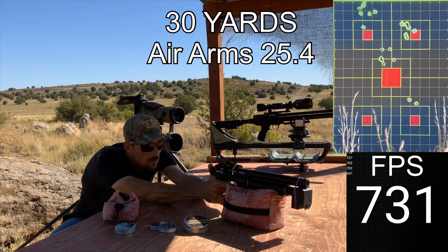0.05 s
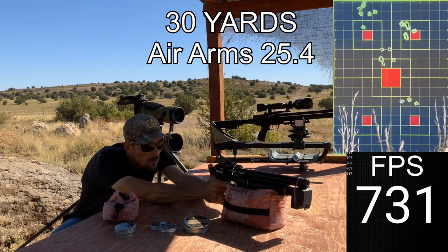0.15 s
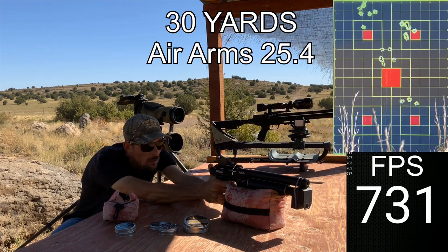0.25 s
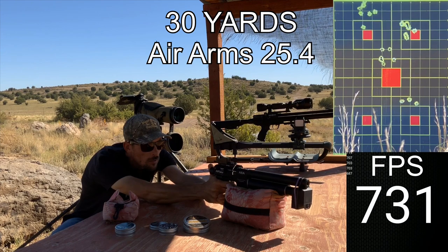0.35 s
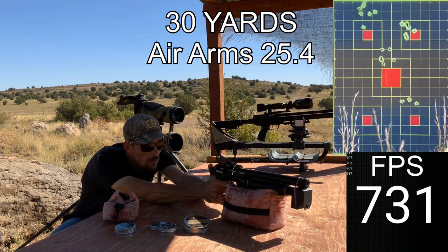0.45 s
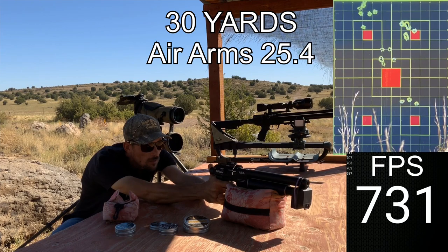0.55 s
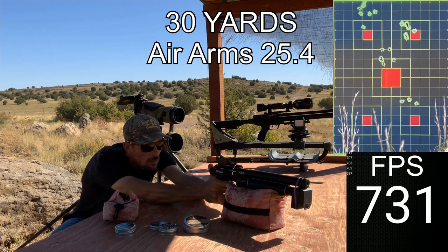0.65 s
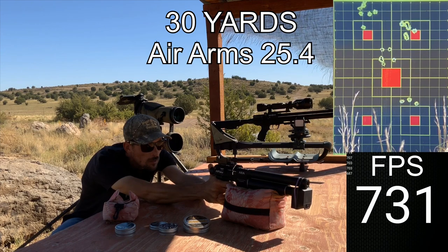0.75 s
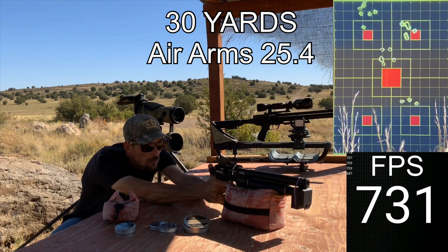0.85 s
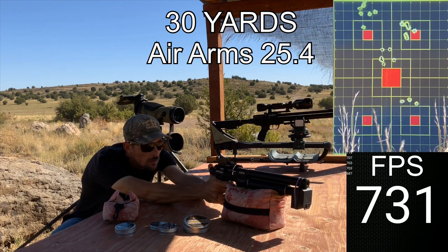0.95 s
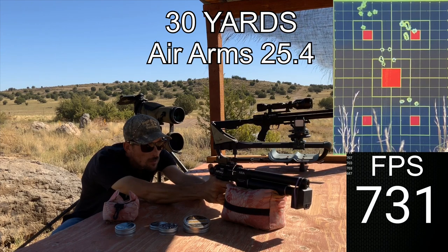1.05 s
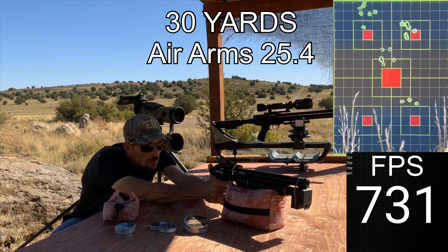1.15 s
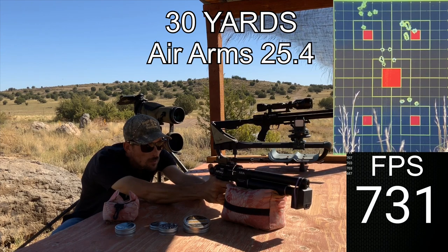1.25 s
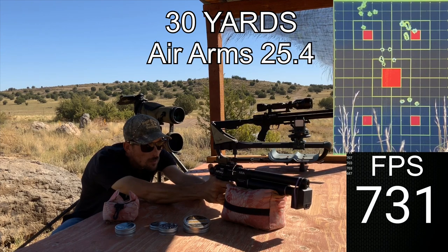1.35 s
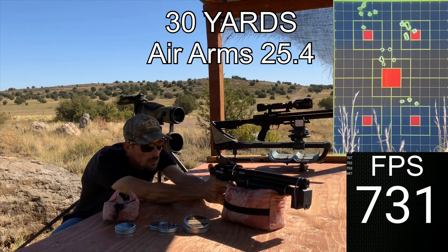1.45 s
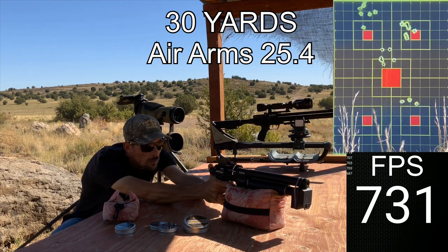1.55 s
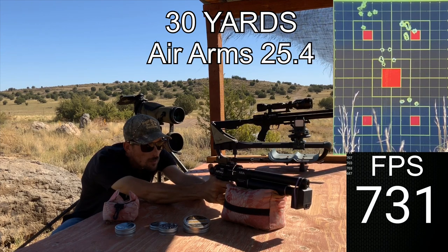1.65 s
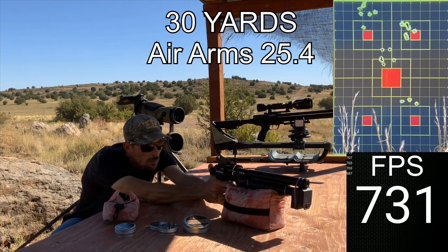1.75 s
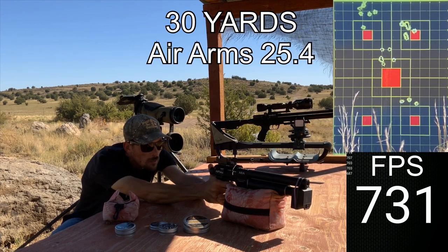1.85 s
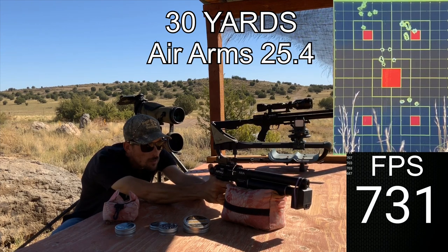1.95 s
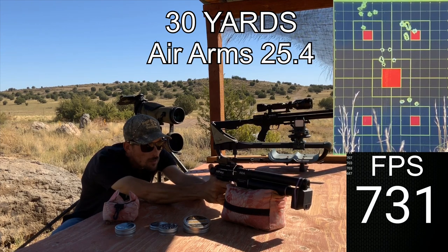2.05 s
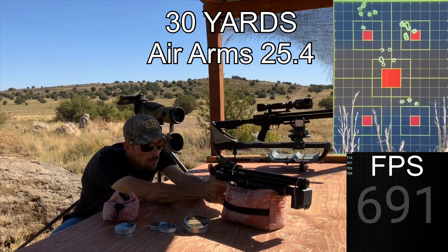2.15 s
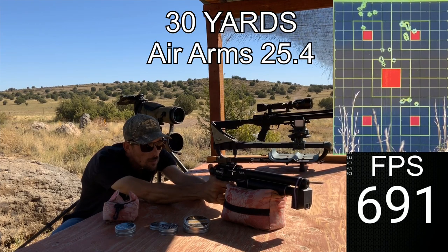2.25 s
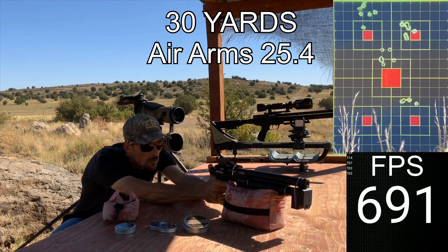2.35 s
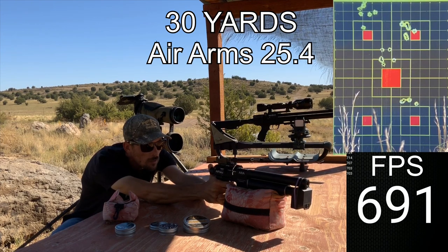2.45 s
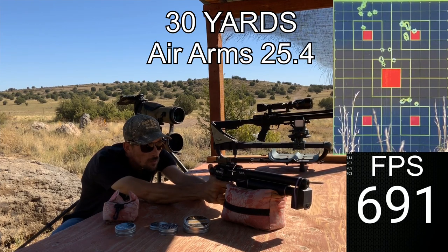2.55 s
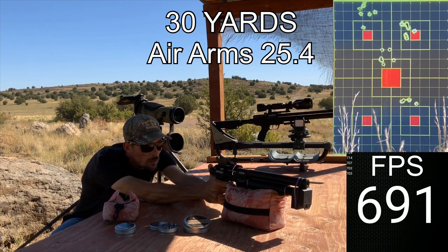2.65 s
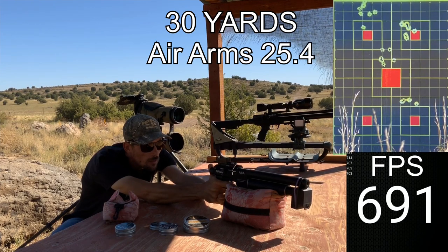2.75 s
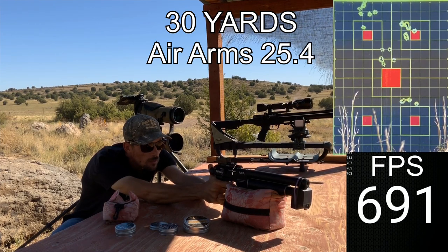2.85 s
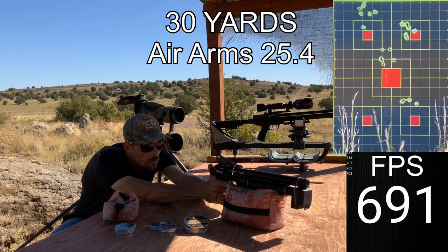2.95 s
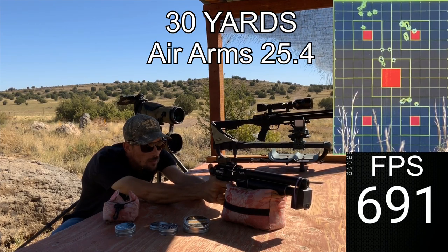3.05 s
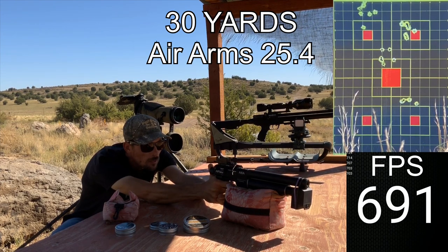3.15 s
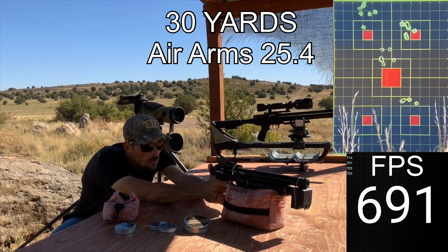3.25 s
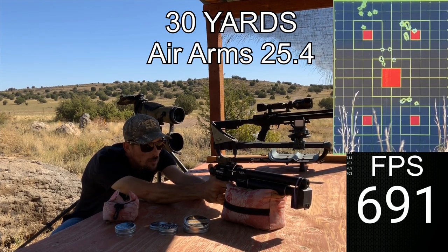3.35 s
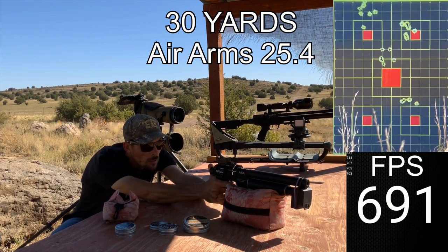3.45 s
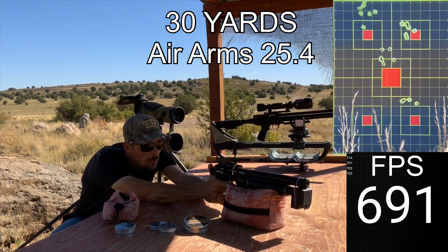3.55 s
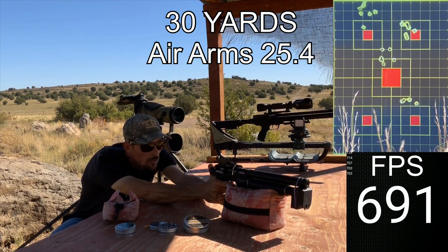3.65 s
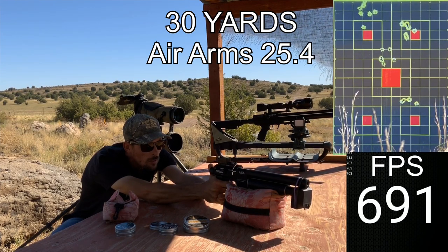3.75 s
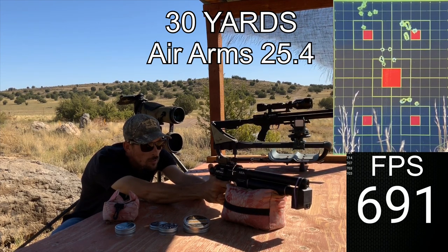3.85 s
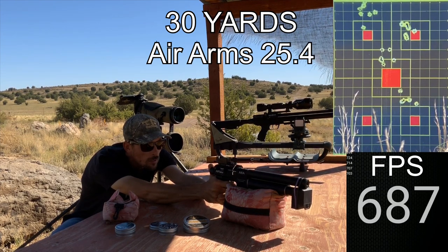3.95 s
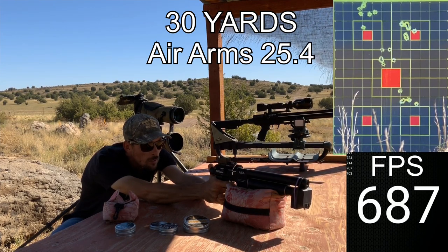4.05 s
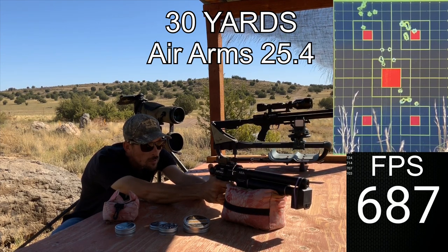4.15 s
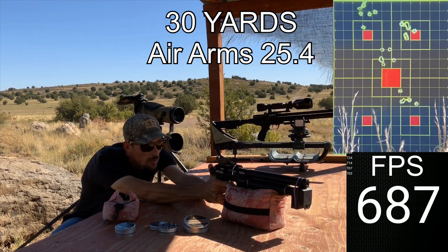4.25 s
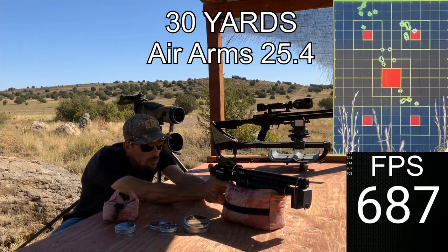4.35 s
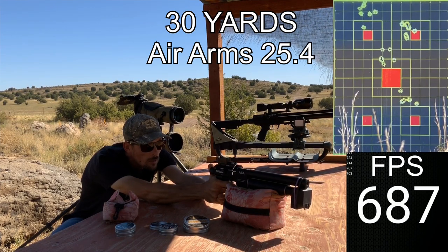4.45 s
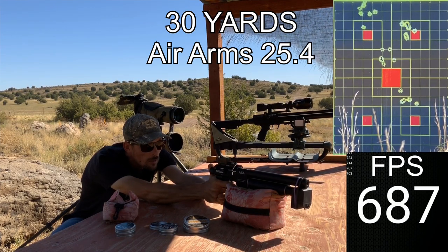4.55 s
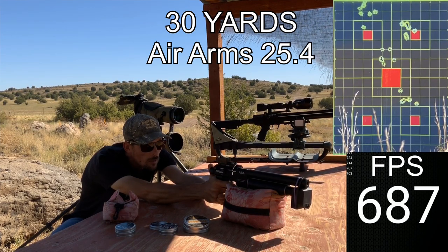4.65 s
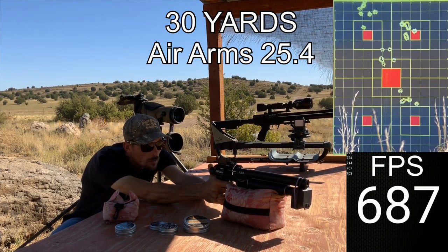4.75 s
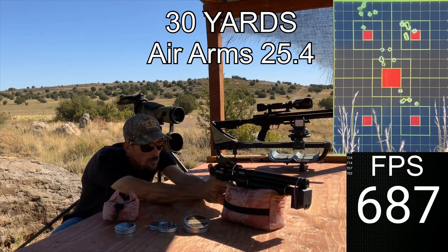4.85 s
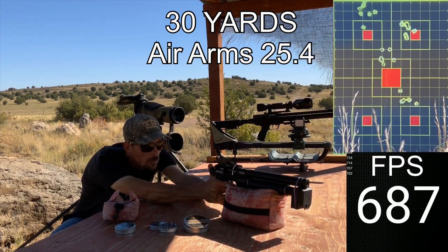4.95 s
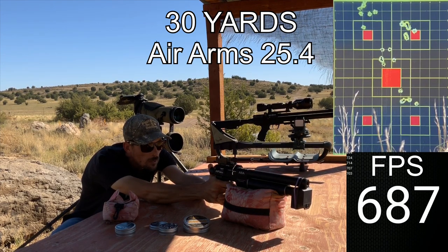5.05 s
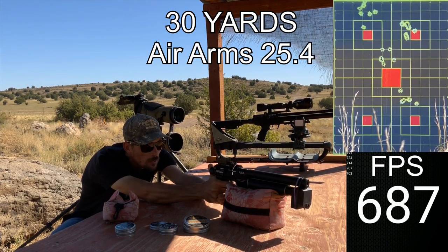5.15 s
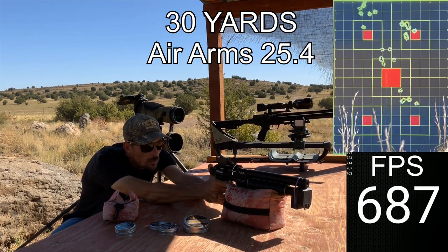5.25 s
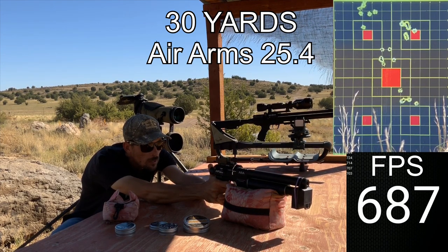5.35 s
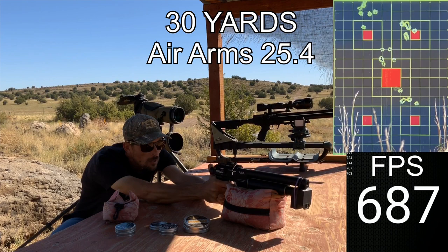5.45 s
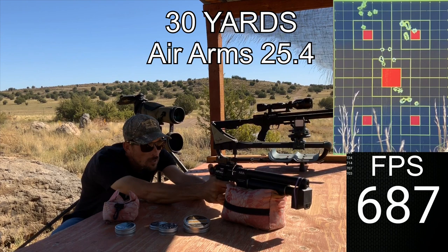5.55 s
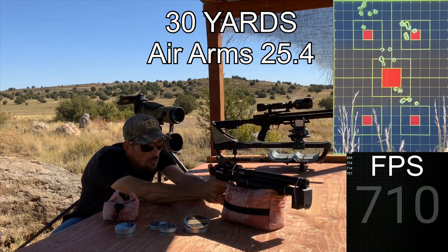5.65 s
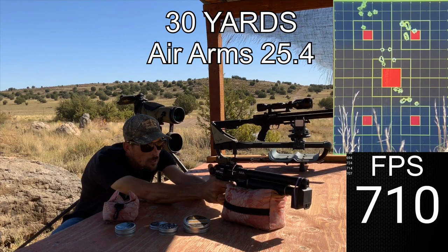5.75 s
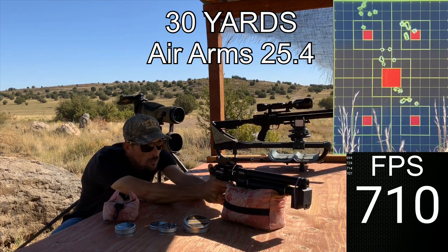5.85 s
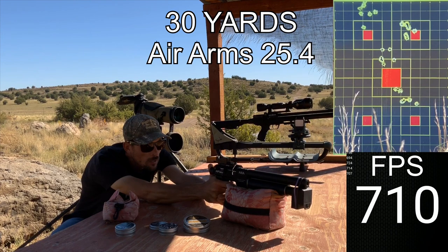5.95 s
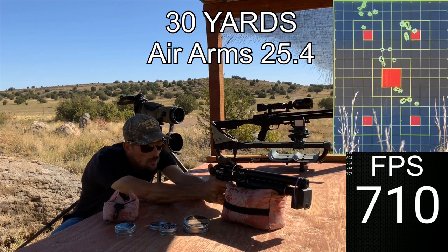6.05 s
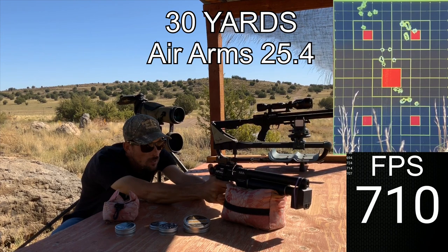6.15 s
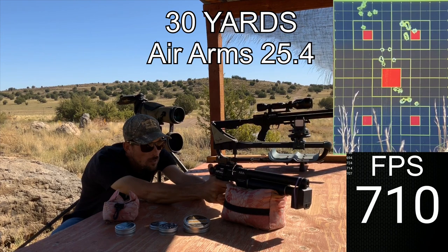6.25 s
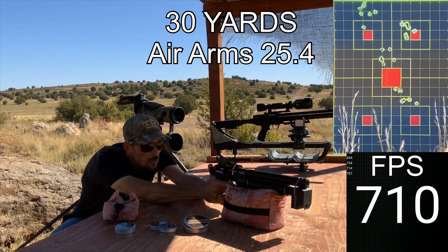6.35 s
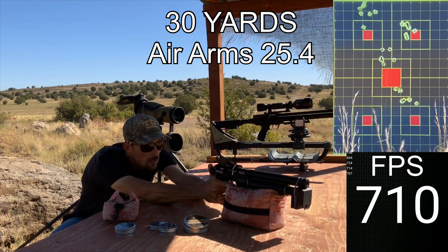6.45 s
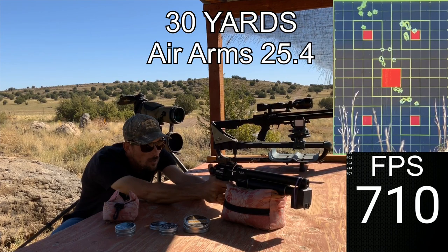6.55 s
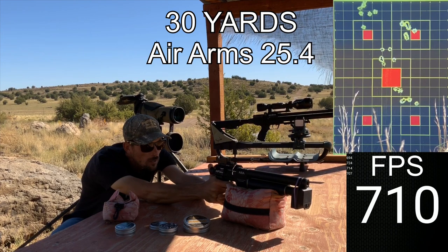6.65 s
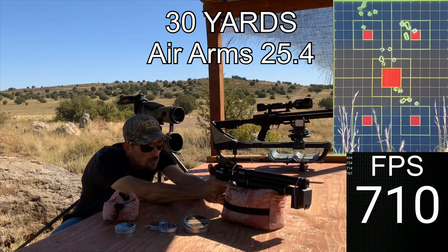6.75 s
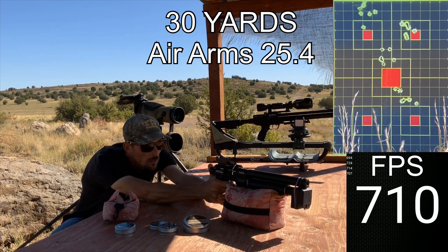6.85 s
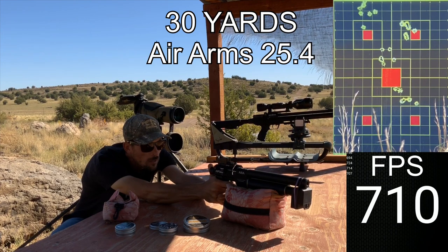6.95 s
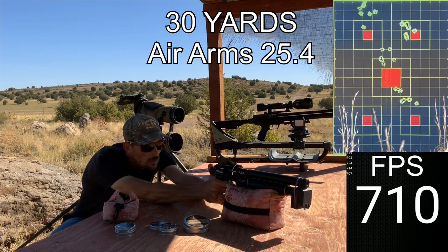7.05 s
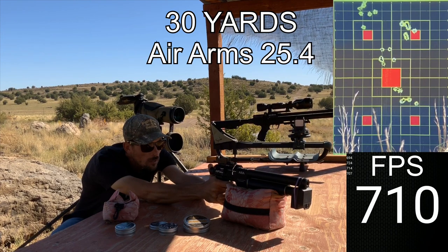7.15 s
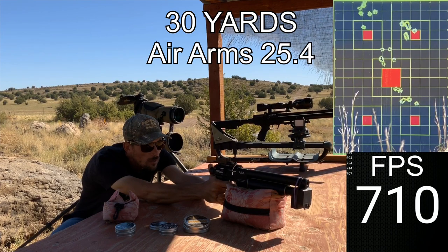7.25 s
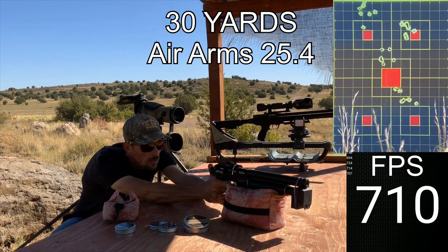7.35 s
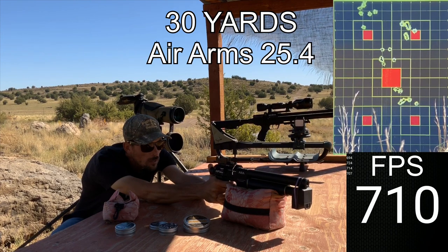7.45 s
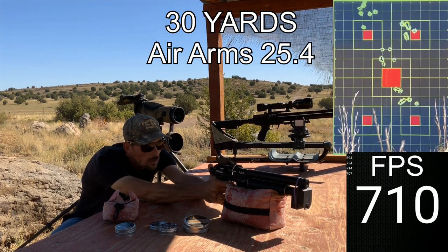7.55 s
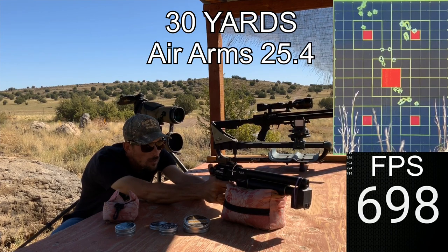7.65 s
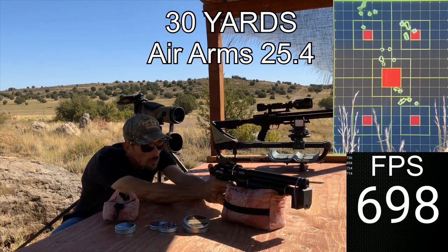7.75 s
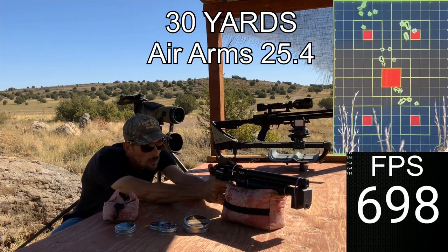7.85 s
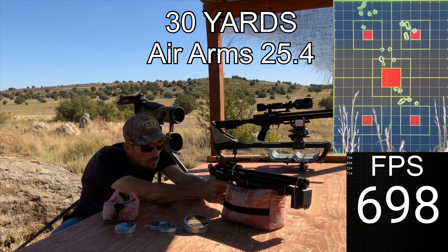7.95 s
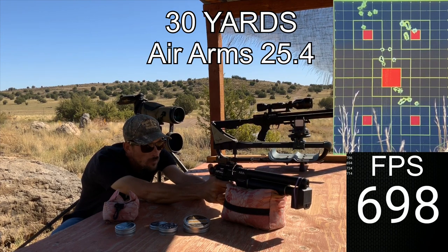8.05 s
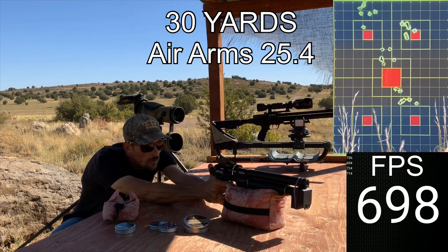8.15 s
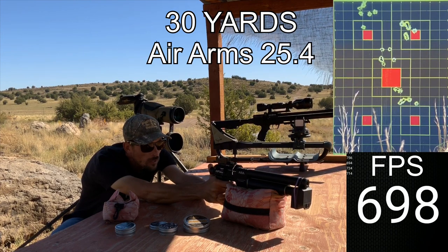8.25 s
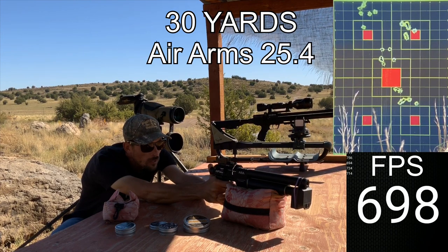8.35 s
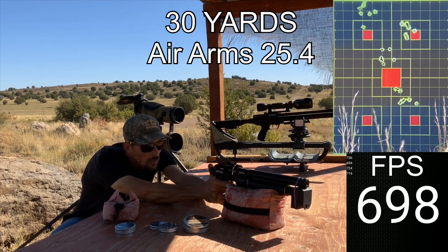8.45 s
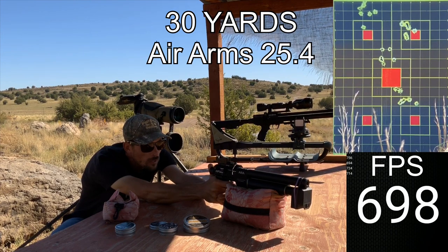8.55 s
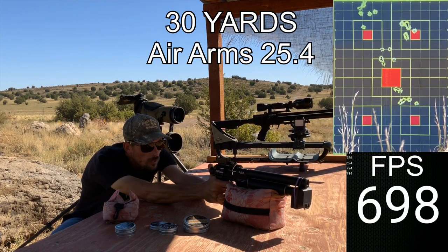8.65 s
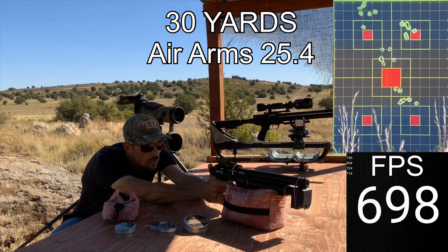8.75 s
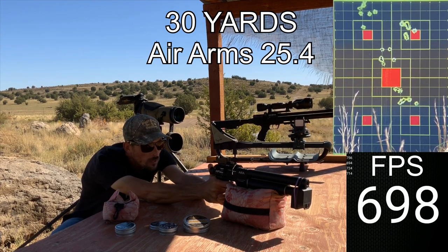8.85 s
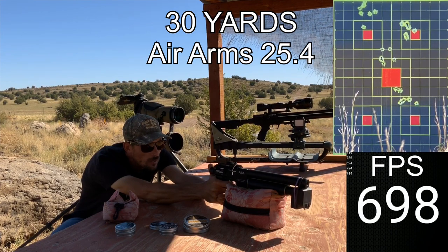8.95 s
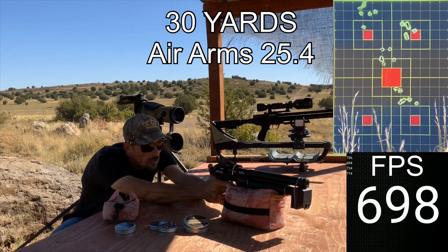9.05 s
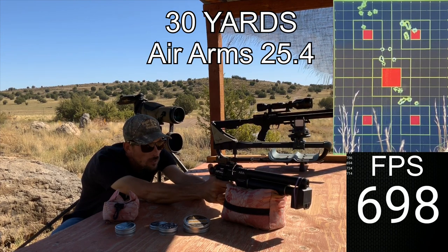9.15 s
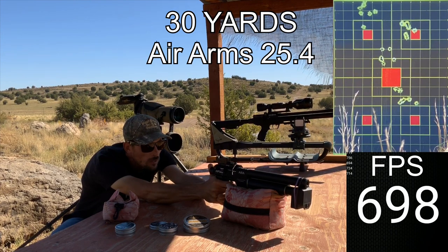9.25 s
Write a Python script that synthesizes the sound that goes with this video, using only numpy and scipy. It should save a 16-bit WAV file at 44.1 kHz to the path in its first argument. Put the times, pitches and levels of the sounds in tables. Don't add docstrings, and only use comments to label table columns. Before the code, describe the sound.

An air gun fires five times at a steady, unhurried pace from a wooden bench under a roof. Each shot is a hissy gas blast and hard crack with a woody boom and quick echo; a quarter second later the pellet smacks a steel plate, which clangs and rings briefly. Between shots there is quiet open country: low wind, a wavering far engine hum, faint insect hiss. Close stereo microphone.

```python
import sys
import numpy as np
from scipy import signal
from scipy.fft import rfft, irfft, next_fast_len
from scipy.io import wavfile
from scipy.ndimage import uniform_filter1d

SR = 44100
rng = np.random.default_rng(int(sys.argv[2]) if len(sys.argv) > 2 else 0)


def master(y):
    cut = np.clip(np.atleast_2d(y).T, -1, 1)
    pcm = np.round(cut * 32767)
    wavfile.write(sys.argv[1], SR, pcm.astype(np.int16))


def undo_db(level):
    steps = np.asarray(level, float) / 20
    return 10 ** steps


N = 409688
SPAN, LONG = 20480, 53248
LEAD = 2000

# (shot [s], blast [dB], valve opens late [s], gas flows [s], roof slap [dB])
SHOTS = [
    (.047, 1.5, -0.00052, 0.011, 0.5),
    (2.0722, 0.5, 0.0008, 0.013, -1),
    (3.8023, 1.5, -0.0007, 0.017, 0),
    (5.3563, 1.5, -0.000027, 0.017, 0),
    (7.2924, 1.5, -0.0016, 0.013, 1.5),
]
# (frequency [Hz], density [dB per Hz])
SLAP = [(120, -26.5), (200, -5.5), (440, -5.5), (623, -10.5), (883, -2.5), (1620, -4.5), (2800, -24),
        (5130, -12), (7140, -16.5), (9400, -14), (11100, -9), (12400, -19), (14900, -18.5), (16000, -23)]
# (frequency [Hz], density [dB per Hz])
THUD = [(76, -22.5), (130, 10.5), (346, -5), (510, -13.5), (575, -21.5), (700, -5), (910, -36.5),
        (1540, -120)]


def colour(x, table):
    hz, db = np.transpose(table)
    f = np.maximum(np.fft.rfftfreq(x.shape[-1], 1 / SR), 1)
    gain = undo_db(np.interp(np.log(f), np.log(hz), db, left=-90))
    return rfft(x) * gain / np.sqrt(np.mean(gain ** 2))


def walk(rate, size):
    k = int(SR / rate)
    held = np.repeat(rng.standard_normal(size // k + 1), k)[:size]
    return 0.97 * uniform_filter1d(uniform_filter1d(held, k), k)


def fade(t, t60):
    return (t >= 0) * np.exp(-np.log(1000) * np.maximum(t, 0) / t60)


def bump(centre_s, length_s):
    return np.exp(-(2 * (np.arange(N) / SR - centre_s) / length_s) ** 2)


def event_time(size=SPAN):
    return (np.arange(size) - LEAD) / SR


def add(out, x, s):
    i = int(round(s * SR)) - LEAD
    a, b = max(i, 0), min(i + x.shape[-1], N)
    out[:, a:b] += x[..., a - i:b - i]


def ring(modes):
    t = event_time()
    return sum(undo_db(db) * fade(t, t60) * np.sin(2 * np.pi * hz * t) for hz, db, t60 in modes)


def burst(table, stage, heard, habit, pair_hz=7900, top_hold=1):
    delay, rise, hold, low_t60, high_t60 = stage
    db, width, low_pan_db, high_pan_db = heard
    split_hz, same_rad, spit_db = 2600, 0.83, 2.5
    t, f = event_time() - delay, np.fft.rfftfreq(SPAN, 1 / SR)
    new = rng.standard_normal((2, SPAN))
    share = 1 / (1 + (f / split_hz) ** 8)
    low = share * colour(np.sin(same_rad) * habit + np.cos(same_rad) * new, table)
    high = (1 - share) * colour(new, table)
    swell = np.exp(np.minimum(t, 0) / rise) * undo_db(db)
    spit = undo_db(spit_db * walk(1500, SPAN))
    parts = [(low, low_t60, low_pan_db, 1, hold), (high, high_t60, high_pan_db, spit, hold * top_hold)]
    out = 0
    for (mid, side), t60, pan_db, lumps, held_s in parts:
        lean = (undo_db(pan_db) - 1) / (undo_db(pan_db) + 1)
        side = (width * side + lean * mid) / (1 + (f / pair_hz) ** 16)
        level = swell * lumps * fade(np.maximum(t - held_s, 0), t60)
        out = out + level * irfft([mid + side, mid - side])
    return out


def buzz():
    centre_hz, width_hz, spits_per_s, level_db = 11100, 1300, 60, -87
    turns = spits_per_s * np.arange(N) / SR
    edges_hz = [centre_hz - width_hz / 2, centre_hz + width_hz / 2]
    band = signal.butter(N=2, Wn=edges_hz, btype="band", fs=SR, output="sos")
    spits = np.exp(6.0 * (np.cos(2 * np.pi * turns) - 1)) * undo_db(.6 * walk(2.1, N))
    rasp = signal.sosfilt(band, spits * rng.standard_normal(N))
    return undo_db(level_db) * rasp / np.std(rasp)


def air():
    # (frequency [Hz], density [dB per Hz])
    wind_colour = [(18, -86.5), (30, -52), (53, -25.5), (69, -0.5), (123, 1.5), (167, -2), (194, -5.5),
                   (252, -11), (662, -29), (1500, -37), (1950, -66.5), (3300, -120)]
    hiss_colour = [(290, -35), (500, -4), (775, -8), (1040, -12), (1190, -11), (2190, -15), (2460, -17),
                   (2850, -16.5), (4170, -18.5), (9330, -26), (11000, -27), (14300, -30), (15300, -51.5)]
    crackle_colour = [(300, -30), (700, -6.5), (2500, -6.5), (6000, -7.5), (10000, -10.5), (14500, -13),
                      (15500, -40)]
    # (time [s], wind level [dB])
    gusts = [(0, -47.5), (.75, -55.5), (1.6, -51.5), (2.7, -52), (3.4, -56), (4.5, -55.5), (5.75, -51),
             (6.2, -56), (7.0, -60.5), (7.9, -56.5), (9.29, -61)]
    # (centre [s], length [s], level [dB])
    rustles = [
        (1.0, 0.067, -87),
        (1.406, .25, -89),
        (4.349, 0.26, -86.5),
        (4.69, 0.31, -89),
        (5.723, 0.19, -54.5),
        (6.157, 0.27, -85),
        (6.42, 0.26, -73.5),
        (8.303, 0.22, -89),
    ]
    hiss_db, still_db = -74, -79
    far_echo_db, far_echo_t60_s = -62, 4.6
    t = np.arange(N) / SR
    wind_db = np.interp(t, *np.transpose(gusts)) + 3.0 * walk(23, N) - 0.5
    rustle = undo_db(still_db) + sum(undo_db(far_echo_db) * fade(t - s, far_echo_t60_s) for s, *_ in SHOTS)
    rustle = rustle + sum(undo_db(db) * bump(s, length_s) for s, length_s, db in rustles)
    size = next_fast_len(N + N % 2, True)
    wind, hiss, dry_noise = (irfft(colour(rng.standard_normal((2, size)), table), size)[:, :N]
                             for table in (wind_colour, hiss_colour, crackle_colour))
    mid, side = wind * undo_db(wind_db)
    crackle = rustle * undo_db(5.5) * (0.4 + np.clip(walk(300, N) - .6, 0, .35))
    near, wide = hiss * undo_db(hiss_db) + dry_noise * crackle * undo_db(-4)
    ears = np.array([[1], [-1]])
    return mid + near + ears * (.07 * side + .06 * wide)


def drone():
    firing_hz = 83
    orders_db = [-68, -76.5, -79.5, -85, -91.5]
    # (centre [s], length [s], order, peak [dB])
    swells = [(1.698, 1.1, 1, -62.5), (3.0, 1.14, 1, -60), (4.697, 1.1, 1, -56), (6.499, 1.9, 1, -55.5),
              (8.4, 1.5, 1, -57.5), (1.898, 0.9, 2, -60.5), (2.701, 1.08, 2, -58.5), (4.854, 0.58, 2, -53),
              (6.304, 1.3, 2, -61.5), (8.8, 1.2, 2, -64), (1.8, 0.98, 3, -61.5), (4.8, 1.2, 3, -62),
              (6.798, 1.2, 3, -74.5), (8.8, 1.2, 3, -67.5), (1.898, 0.39, 4, -66), (4.696, 0.53, 4, -72.5),
              (6.4, 1.1, 4, -76.5), (8.8, 1.3, 4, -80.5), (4.702, 1.1, 5, -86), (6.5, 1.3, 5, -86.5),
              (8.794, 1, 5, -91)]
    phase = 2 * np.pi * np.cumsum(firing_hz * (1 + 0.0086 * walk(17.0, N))) / SR
    out = 0
    for order, still_db in enumerate(orders_db, 1):
        size = undo_db(still_db)
        size = size + sum(undo_db(db) * bump(s, length_s) for s, length_s, k, db in swells if round(k) == order)
        waver = undo_db((2.5 + .6 * (order - 1)) * walk(14.0, N))
        out = out + np.sqrt(2) * size * waver * np.sin(order * phase)
    return out


def ticks():
    # (time [s], peak [dB], frequency [Hz], t60 [s])
    knocks = [(0.025, -52, 4960, 0.0124), (2.051, -52, 5100, 0.009), (5.337, -53.5, 5090, 0.019),
              (1.198, -30, 118.4, 0.066), (1.594, -24, 112, 0.023), (1.638, -31.5, 201.3, 0.0186),
              (2.91, -60.5, 880, 0.086), (3.604, -59.5, 980, 0.076), (3.61, -64, 1164, 0.071),
              (5.631, -10, 215, 0.04), (5.632, -19.5, 400, 0.015), (5.695, -29, 707, 0.058),
              (5.643, -22.5, 148.5, 0.13), (5.709, -29, 132, 0.3), (2.262, -50.5, 5700, 0.0059),
              (3.977, -40, 2700, .006), (5.455, -29, 10970, 0.013), (5.527, -45, 6030, 0.0037),
              (5.578, -47, 4640, .012), (5.73, -34, 5680, .004), (5.747, -51, 11100, .01),
              (5.84, -64.5, 10950, .01), (5.762, -34.5, 5070, 0.0029), (5.762, -41, 2980, 0.0133),
              (5.799, -50, 5360, 0.0114), (5.823, -41, 6600, 0.0017), (8.453, -57, 4010, 0.0039),
              (8.555, -70.5, 1400, .05), (8.605, -65.5, 1480, .05), (8.895, -65, 1137, 0.056),
              (9.115, -65.5, 1190, 0.063)]
    out, t = np.zeros((2, N)), event_time()
    for s, db, hz, t60 in knocks:
        add(out, ring([(hz, db + 2.5, t60)]) * (1 - fade(t, 3 / hz)), s)
    return out


def plate(spot, lasting_db):
    # (frequency [Hz], level [dB], t60 [s])
    plate_modes = [
        [(733, -31.5, 0.6), (719, -34.5, 0.48), (881.3, -17, 0.21), (1045, -7, 0.15), (1200, -25, 0.34),
         (1230, -22, 0.2), (1370, -2.5, 0.3), (1370, -23, 0.7), (1483, -12.5, 0.23), (1560.4, -18, 0.42),
         (1620, -9.5, 0.31), (1695, -30, 0.6), (1865, -25, 0.79), (1967, -16, 0.2), (2143, -33.5, 1.15),
         (2354, -30.5, 0.45), (3017, -39.5, 0.23), (3980, -41, 0.46), (5260, -31.5, 0.35), (5060, -33.5, 0.3),
         (3670, -34, .3), (5300, -32.5, .35), (5680, -31.5, 0.27), (6160, -32, .25)],
        [(700, -12.5, 0.577), (903, -16.5, 0.53), (980, -6.5, 0.396), (1157, -11, 0.47), (1604, -3.5, 0.33),
         (1700, -20, 0.39), (1400, 1.5, 0.23), (1550, -7, 0.46), (1622, -6.5, 0.58), (1676, -13, 0.23),
         (1670, 1, 0.37), (1930, -12.5, 0.56), (1986, 3, 0.21), (2043, -11.5, 0.29), (2148.5, -17.5, 1.395),
         (2320, -9.5, 0.43), (3015, -27, 0.57), (3740, -23, 0.5), (5140, -24.5, 0.3), (5222, -20, 0.35),
         (5370, -21, .3), (5670, -26, 0.24), (6300, -14, 0.336), (6390, -22, .25)],
    ]
    spot_db = [-15.5, -26]
    lag_s, build_t60_s, spread, scatter_db = .019, .04, .28, .7
    waver_db, waver_per_s, steady = 2.5, 30, .4
    t = event_time(LONG) - lag_s
    chance = rng.standard_normal((len(plate_modes[spot]), 3))
    blow = 1. * (np.arange(LONG) == np.argmax(t > 0))
    mid, side = 0, 0
    for (hz, db, t60), (turn, lean, size) in zip(plate_modes[spot], chance):
        lasting = 1800 < hz < 2200
        db = db + lasting_db * lasting + scatter_db * size
        pole = np.exp((2j * np.pi * hz - np.log(1000) / t60) / SR)
        mode = signal.lfilter([undo_db(db) * np.exp(3j * turn)], [1, -pole], blow)
        depth_db = waver_db * (steady if lasting else min(hz / 1800, 2))
        mode *= undo_db(depth_db * (walk(waver_per_s * max(hz / 1500, 1), LONG) - .3))
        mid, side = mid + mode.imag, side + spread * lean * mode.real
    return np.array([mid + side, mid - side]) * (1 - fade(t, build_t60_s)) * undo_db(spot_db[spot])


def strikes():
    # (time [s], first arrival [dB], smack [dB], ring [dB], lasting modes [dB])
    hits = [
        (.281, 0, 0.5, 1.5, 0.5),
        (2.3089, -0.5, 1.5, 2.5, -2.5),
        (4.040, 1, 0, -2.5, -2),
        (5.593, 0.5, 2.5, -2.5, -1),
        (7.535, -4.5, -1.5, -2.5, 2.5),
    ]
    spots = [0, 0, 1, 1, 0]
    # (tick [dB], snap [dB])
    edges = [(-4, -2.5), (-10, -18), (-1, 0), (-9, 2), (-4, -7)]
    # (delay [s], rise [s], hold [s], low t60 [s], high t60 [s])
    stages = [
        (-.036, 0.0045, 0.02, .12, 0.17),
        (.0, 0.00025, 0.00056, .006, .006),
        (.0045, 0.0016, .012, 0.12, .15),
        (0.0175, 0.00022, .0008, 0.0047, 0.0086),
        (0.021, 0.0027, .016, 0.18, 0.13),
        (.07, 0.034, 0.029, 0.81, 0.47),
        (.02, 0.011, 0.011, 0.47, 0.48),
    ]
    # (level [dB], width [0-1], low left-right [dB], high left-right [dB])
    heard = [(-37.5, .01, 1, 1), (-21.5, .6, 4.4, -3), (-26, .9, 16, -6.5), (-30, 0.034, 2.5, -3),
             (-23, .32, 2.5, 1), (-49.5, 0.64, 3.5, -1.5), (-37.5, .03, .3, -10)]
    # (frequency [Hz], density [dB per Hz])
    far_colours = [
        [(240, -51), (400, -20), (765, -20.5), (1060, -0.5), (1250, -5.5), (1750, -11), (1990, -2), (2360, -24),
         (5030, -24), (11200, -37.5), (14400, -42.5), (16000, -60)],
        [(240, -52), (400, -23), (814, -21), (1630, -8.5), (1760, -2), (1960, -1), (2630, -26), (5190, -27.5),
         (10900, -35), (16000, -52)],
    ]
    smack_colours = [
        [(240, -53.5), (400, -16.5), (708, -22.5), (1060, 1.5), (1350, -3), (2050, -5), (2400, -12.5),
         (3990, -26), (6640, -7.5), (7870, -8.5), (9300, -18), (10000, -44.5), (16000, -69.5)],
        [(240, -56), (400, -34), (742, -11), (1060, -1), (1710, -6), (1930, 8.5), (2550, -12), (4050, -16),
         (5350, -18), (6240, -4), (7990, -2), (9300, -12.5), (10000, -40), (16000, -67)],
    ]
    clang_colours = [
        [(180, -64), (300, -35), (502, -20.5), (801, -26.5), (1040, -3), (1280, -12.5), (1390, -6.5),
         (1510, -7), (2610, -33.5), (4300, -34), (5520, -30.5), (9330, -41), (11100, -31.5), (12500, -43.5),
         (12900, -60.5), (13300, -43), (14500, -44.5), (15000, -80)],
        [(180, -53.5), (300, -32), (565, -12), (678, -17.5), (994, -2.5), (1340, -2), (1640, -5.5),
         (2790, -23.5), (4590, -28.5), (5300, -15), (9300, -29), (11000, -17), (12500, -30.5), (12900, -51.5),
         (13300, -28), (14700, -30), (15300, -70)],
    ]
    # (frequency [Hz], density [dB per Hz])
    tick_colour = [(500, -26), (1500, -5.5), (3000, -11.5), (6500, 0), (9500, -6.5), (10300, -37),
                   (16000, -61)]
    tail_colour = [(240, -38.5), (400, -11.5), (635, -12.5), (994, -0.5), (1290, -4), (1840, -5),
                   (2700, -14.5), (4600, -15), (5250, -13.5), (6200, -16), (7000, -18.5), (8600, -25),
                   (10900, -29), (12500, -33), (14800, -33), (16000, -54)]
    smack_top_hold = 0.33
    out, habits = np.zeros((2, N)), rng.standard_normal((len(stages), 2, SPAN))
    for hit, spot, (tick_db, snap_db) in zip(hits, spots, edges):
        s, first_db, smack_db, ring_db, lasting_db = hit
        colours = [far_colours[spot], tick_colour, smack_colours[spot], SLAP,
                   clang_colours[spot], tail_colour, THUD]
        top_holds = [1, 1, smack_top_hold, 1, 1, 1, 1]
        first, tick, smack, snap, clang, tail, thud = (
            burst(*a, top_hold=top) for *a, top in zip(colours, stages, heard, habits, top_holds))
        impact = undo_db(tick_db) * tick + smack + undo_db(snap_db) * snap + tail + thud
        add(out, undo_db(first_db) * first + undo_db(smack_db) * impact, s)
        add(out, undo_db(ring_db) * clang, s)
        add(out, undo_db(ring_db) * plate(spot, lasting_db), s)
    return out


def bench():
    # (frequency [Hz], level [dB], t60 [s])
    board_modes = [(124.3, -19.8, .6), (128.3, -20.5, .294), (168.4, -21.3, .068), (218.1, -28.6, .096),
                   (291.6, -29.9, .078), (386.3, -23, .06)]
    # (delay [s], level [dB], push [s])
    blows = [
        (.0121, -3, .006),
        (.0208, -3, .0031),
        (.026, 2, .0035),
        (.039, 5, .006),
        (.0475, 5, .0016),
        (.0509, 7, .0055),
        (.0775, -7, .0032),
        (.0807, -2, .0054),
        (.0878, -1, .0058),
    ]
    # (frequency [Hz], level [dB], t60 [s])
    hum_modes = [(122, -30, .55)]
    hum_lag_s, hum_swell_s = .137, .06
    t, force = np.arange(SPAN) / SR, 0
    for delay, db, push_s in blows:
        inside = np.clip((t - delay) / push_s, 0, 1)
        force = force + undo_db(db) * np.sin(np.pi * inside) * np.pi / (2 * push_s * SR)
    boom = signal.fftconvolve(ring(board_modes), force)[:SPAN]
    boom = signal.sosfiltfilt(signal.butter(N=2, Wn=58, btype="high", fs=SR, output="sos"), boom)
    late = event_time() - hum_lag_s
    hum = np.roll(ring(hum_modes), int(hum_lag_s * SR))
    return boom + hum * (1 - fade(late, hum_swell_s)) * (late > 0)


def boom_shape(after_db):
    # (delay [s], level [dB])
    beats = [(.095, 1), (.11, 5), (.124, -1), (.134, -24), (.145, 4), (.17, 0.5), (.182, -5), (.23, 1),
             (.3, -5.5)]
    after_s = (.1, 0.15)
    t = event_time()
    beat_db = np.interp(t, *np.transpose(beats)) + np.interp(t, after_s, [0, after_db])
    return undo_db(beat_db + 1.5 * walk(37, SPAN) * (t > after_s[0]))


def thump(habit):
    # (frequency [Hz], level [dB], t60 [s])
    thump_modes = [(149.2, -17, .07), (330, -17.5, .035), (680, -13, .025)]
    # (frequency [Hz], density [dB per Hz])
    rasp_colour = [(300, -29.5), (600, -8), (1200, -6.5), (1800, 0), (2300, -4), (3000, -1), (4000, -10),
                   (6000, -23.5), (9000, -45)]
    # delay [s], rise [s], hold [s], low t60 [s], high t60 [s]
    rasp_stage = (.0, .0035, .006, .1, .1)
    t = event_time()
    rasp = burst(rasp_colour, rasp_stage, (-25, 0, 0, 0), habit)[0]
    soft = sum(ring([mode]) * (1 - fade(t, 5 / mode[0])) for mode in thump_modes)
    return (rasp + soft) * [[1], [-1]]


def shots():
    # (delay [s], rise [s], hold [s], low t60 [s], high t60 [s])
    stages = [
        (0.0012, .0026, 0.013, 0.11, 0.091),
        (0.041, 0.00052, 0.0015, 0.082, 0.046),
        (0.0518, 0.00097, 0.008, 0.074, 0.085),
        (0.11, .01, 0.026, 0.17, 0.23),
        (.165, .03, 0.11, .2, .2),
        (0.1, .01, 0.015, 0.53, .45),
        (.0545, .0012, .003, .02, 0.018),
    ]
    # (level [dB], width [0-1], low left-right [dB], high left-right [dB])
    heard = [(-11.5, 0.004, 0, 0), (-14, 0.5, 6.5, -1.5), (-15.5, 0.12, -0.5, -1), (-42.5, .2, 1, 0),
             (-51, .5, 3, -1), (-38, 0, -1, 3.5), (-15.5, .05, 0, 0)]
    # (frequency [Hz], density [dB per Hz])
    blast_colour = [(180, -40), (300, -8.5), (574, -18.5), (800, -2.5), (1050, -6.5), (1300, -7),
                    (2000, -8.5), (2360, -14.5), (2930, -4.5), (3400, -8), (4160, -3), (6850, -0.5),
                    (8000, -10.5), (9390, -27), (14700, -36), (16000, -46)]
    crack_colour = [(120, -43), (200, -9), (500, -3.5), (883, 0), (1620, -5), (2380, -6), (4600, -11),
                    (5330, -3.5), (6050, 0.5), (7140, -14.5), (7830, -5.5), (10900, -18), (12400, -15.5),
                    (16000, -23.5)]
    field_colour = [(240, -35), (400, -6), (630, -13.5), (964, -2), (1450, -1), (2000, -6), (2740, -24),
                    (3400, -17.5), (4500, -19.5), (5250, -9.5), (6200, -14), (9800, -21), (10900, -19),
                    (12500, -25), (15000, -29.5), (16000, -49)]
    spark_colour = [(5000, -39.5), (7500, -13), (9000, -4.5), (11000, 0.5), (12400, -10), (14500, -6),
                    (16000, -19.5)]
    fizz_colour = [(7000, -30), (8600, 0.5), (9400, 0), (11500, -3), (14700, -10), (16000, -24.5)]
    # (frequency [Hz], level [dB], t60 [s])
    bolt_modes = [(400, -17, 0.037), (1170, -18, 0.012)]
    late_boom_db = [-1.5, -10, -1.5, 1, -0.5]
    fizz_db, fizz_hold_s, fizz_t60_s = -26, 0.0057, 0.074
    bolt_lag_s, pair_lag_s, blast_top_hold = .0574, .0415, .5
    colours = [crack_colour, SLAP, field_colour, field_colour, THUD, spark_colour]
    pairs_hz = [13500] + [7900] * 5
    out, boom = np.zeros((2, N)), bench()
    habits = rng.standard_normal((len(stages), 2, SPAN))
    delay, rise, _, low_t60, high_t60 = stages[0]
    for (s, db, late_s, flow_s, slap_db), after_db in zip(SHOTS, late_boom_db):
        blast_stage = (delay + late_s, rise, flow_s, low_t60, high_t60)
        fizz_stage = (delay + late_s, rise, fizz_hold_s, fizz_t60_s, fizz_t60_s)
        blast = burst(blast_colour, blast_stage, heard[0], habits[0], top_hold=blast_top_hold)
        fizz = burst(fizz_colour, fizz_stage, (fizz_db, 0, 0, 0), habits[0])
        crack, slap, *echoes = (burst(*a, pair_hz=hz) for *a, hz in
                                zip(colours, stages[1:], heard[1:], habits[1:], pairs_hz))
        gas = blast + fizz + crack + undo_db(slap_db) * slap + sum(echoes)
        add(out, undo_db(db) * gas + boom * boom_shape(after_db), s)
        add(out, -ring(bolt_modes), s + bolt_lag_s)
        add(out, thump(habits[1]), s + pair_lag_s)
    return out


def scene():
    return buzz() + air() + drone() + ticks() + strikes() + shots()


def roll_off(x):
    return signal.sosfilt(signal.butter(12, 16840, fs=SR, output="sos"), x)


def record(dry):
    x = signal.sosfilt(signal.butter(N=3, Wn=58, btype="high", fs=SR, output="sos"), dry)
    x = np.tanh(0.85 * x) / 0.99
    x = signal.sosfilt(signal.ellip(8, .2, 70, 15750, fs=SR, output="sos"), x)
    return roll_off(x)


dry = scene()
out = record(dry)
master(out)
```